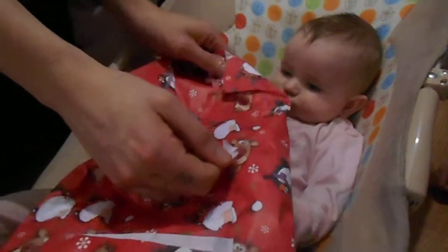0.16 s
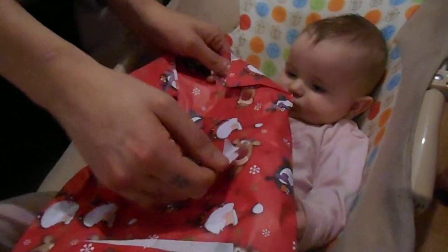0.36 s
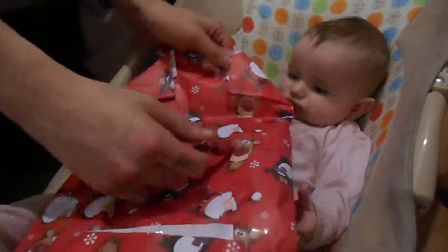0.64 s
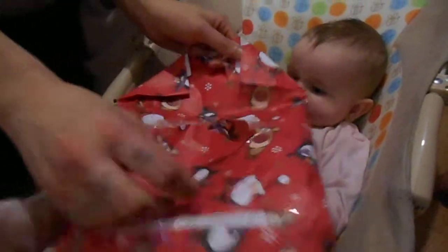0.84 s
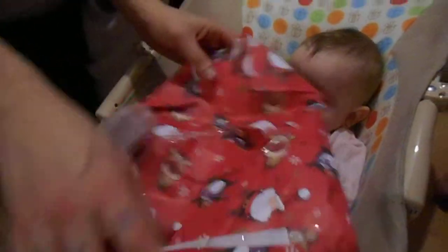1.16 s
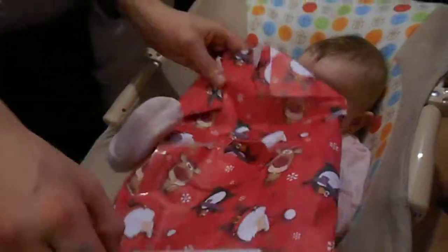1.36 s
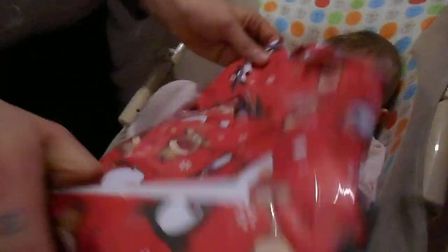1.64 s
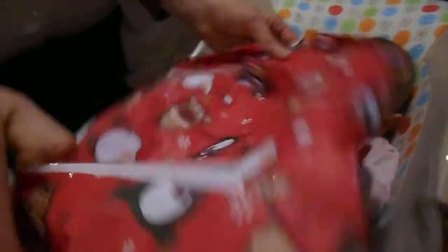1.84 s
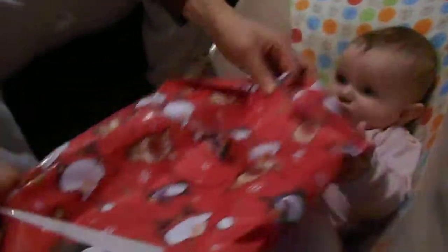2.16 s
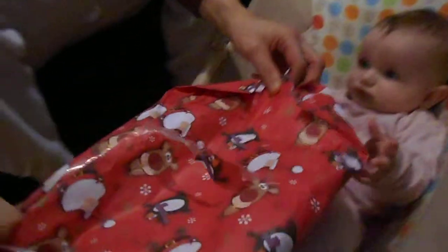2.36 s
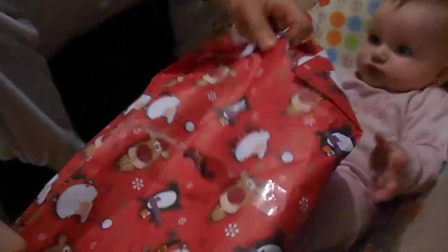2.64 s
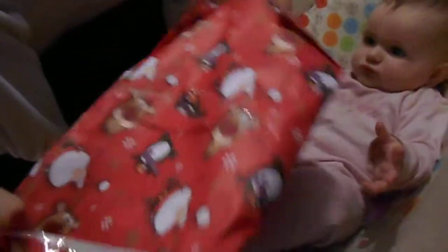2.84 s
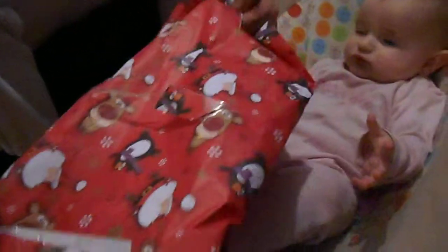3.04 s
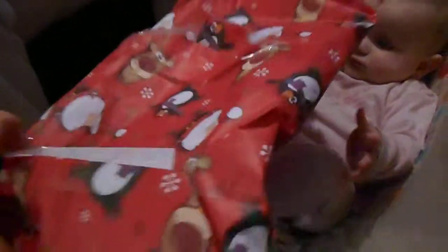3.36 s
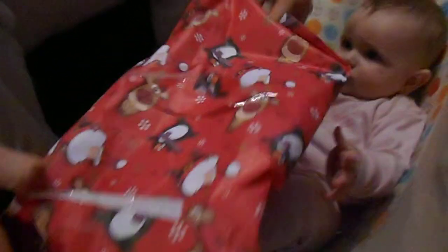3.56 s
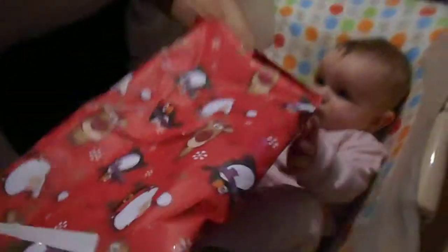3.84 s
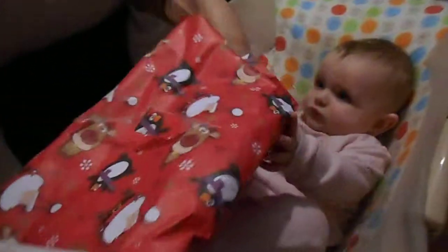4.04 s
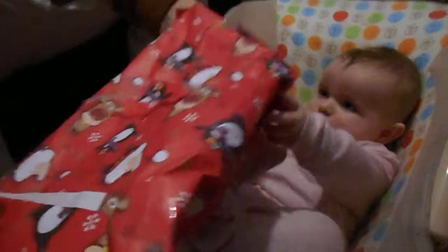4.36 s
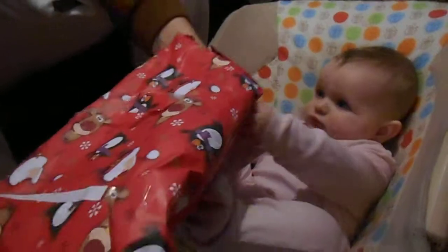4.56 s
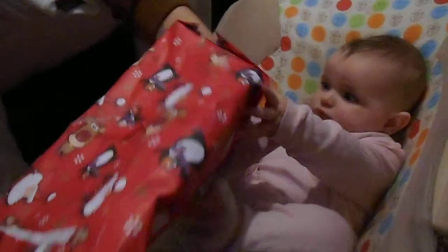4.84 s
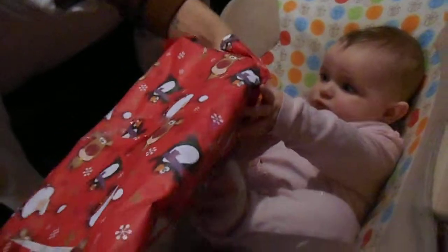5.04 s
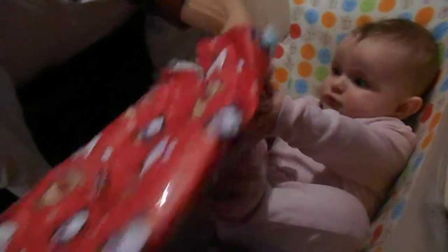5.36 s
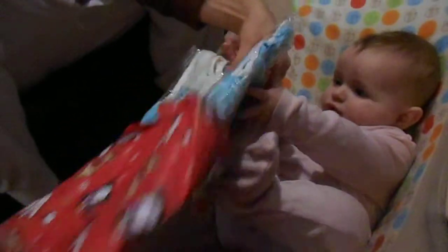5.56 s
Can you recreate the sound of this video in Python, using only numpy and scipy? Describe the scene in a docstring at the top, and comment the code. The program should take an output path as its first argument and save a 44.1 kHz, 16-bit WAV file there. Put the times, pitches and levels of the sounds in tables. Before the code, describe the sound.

Shiny wrapping paper crackles and snaps sharply close by as hands pull it off a boxed present in a small quiet room.

```python
"""Crinkling and sharp snaps start at once: two hands pull shiny wrapping paper off a present.
Small furnished room, camera close by, a quiet noise floor underneath.
Each snap is a crease buckling: a short noise burst with a faint ring at its own note.
Swarms of tiny facet clicks and sliding hiss make the crinkling and the lower flapping of the sheet.
Now and then the wrapped box bumps softly, as a brief decaying tone."""
import sys
import numpy as np
from scipy import signal
from scipy.fft import rfft, irfft
from scipy.io import wavfile
from scipy.ndimage import uniform_filter1d, minimum_filter1d, map_coordinates

SR = 44100
rng = np.random.default_rng(int(sys.argv[2]) if len(sys.argv) > 2 else 0)


def int16_out(signal):
    """Quantize to a 16-bit WAV file."""
    q = np.round(np.clip(np.atleast_2d(signal).T, -1, 1) * 32767)
    wavfile.write(sys.argv[1], SR, q.astype(np.int16))


N = 251678  # length in samples


def amp(db):
    """Decibels to gain."""
    return 10 ** (np.asarray(db) / 20)


def unit(x):
    """Scale to rms 1."""
    return x / np.sqrt(np.mean(x ** 2) + 1e-20)


def along(points, hz):
    """Read a curve of (Hz, value) points at hz, on a log frequency axis."""
    point_hz, values = np.transpose(points)
    return np.interp(np.log(hz + 1), np.log(point_hz + 1), values)


def wobble(rate):
    """A smooth random curve with rate knots a second."""
    knots = rng.standard_normal(int(N * rate / SR) + 4)
    return map_coordinates(knots, [np.arange(N) * rate / SR])


def coloured(x, gain_db, size=2048):
    """Pass x through the causal minimum-phase filter whose level at each frequency is gain_db(hz)."""
    level_db = gain_db(np.fft.rfftfreq(size, 1 / SR))
    cepstrum = irfft(np.log(amp(level_db) + 1e-6))
    # folding the cepstrum forward in time makes the filter causal
    cepstrum[1:size // 2] *= 2
    cepstrum[size // 2 + 1:] = 0
    response = irfft(np.exp(rfft(cepstrum)))
    return signal.fftconvolve(x, response)[:len(x)]


def noise(spectrum):
    """Steady coloured noise of rms 1."""
    return unit(coloured(rng.standard_normal(N), lambda hz: along(spectrum, hz), size=8192))


def add(track, s, sound):
    """Mix a sound into the track at s seconds."""
    part = track[max(round(s * SR), 0):][:len(sound)]
    part += sound[:len(part)]


# The quiet floor. Each row: frequency in Hz, relative level in dB.
FLOOR_SPECTRUM = [(25, -3), (32, -2), (39, -6), (50, -7), (90, -5), (200, 2), (600, -4), (2000, -13),
                  (10000, -21.5)]
FLOOR_DB = -63


def quiet_floor():
    """Steady noise, weighted towards the lows, under everything."""
    return amp(FLOOR_DB) * noise(FLOOR_SPECTRUM)


# Paper merely held and shifted. Each row: time in seconds, fine crinkling level in dB.
GRIP = [(0.0, -44), (0.38, -46), (0.78, -39), (1.13, -40.5), (1.55, -35), (2.0, -37.5), (2.35, -34.5),
        (2.57, -38.5), (3.0, -35.5), (3.24, -34.5), (3.4, -34.5), (3.6, -29.5), (3.95, -35), (5.0, -33),
        (5.7, -33)]
# Pulls and squeezes of the hands. Each row: start in seconds, length in seconds,
# fine crinkling level in dB, flexing level of the broad sheet in dB.
PULLS = [(0.01, 0.08, -23.5, -28.5), (0.245, 0.023, -36, -49), (0.433, 0.042, -35.5, -34.5),
         (0.54, 0.032, -41, -37), (0.648, 0.065, -47, -38.5), (0.84, .05, -25.5, -39),
         (0.97, 0.034, -40, -38), (1.191, .12, -29, -30.5), (1.46, 0.073, -35, -33),
         (1.602, 0.054, -29.5, -29), (1.71, 0.1, -33, -34.5), (1.857, 0.016, -27.5, -33),
         (2.131, 0.11, -40.5, -36), (2.359, 0.017, -31, -34), (2.489, 0.058, -41, -39.5),
         (2.616, 0.085, -29.5, -32.5), (2.756, .25, -29, -31), (3.057, 0.013, -27, -27.5),
         (3.119, 0.054, -32, -36), (3.184, .012, -30, -33), (3.401, 0.11, -35, -34.5),
         (3.621, 0.04, -22.5, -28.5), (3.699, 0.053, -28, -32), (3.795, 0.13, -28.5, -29),
         (3.985, 0.11, -31.5, -32), (4.129, 0.097, -25.5, -28.5), (4.323, 0.037, -27.5, -33.5),
         (4.449, 0.032, -25, -32.5), (4.52, 0.063, -29.5, -31.5), (4.625, 0.024, -27.5, -33.5),
         (4.726, 0.17, -29.5, -38), (4.843, 0.049, -23.5, -25), (4.916, 0.033, -26.5, -38),
         (5.118, 0.0087, -24, -40), (5.199, 0.024, -23, -32.5), (5.29, 0.063, -26.5, -33.5),
         (5.37, .025, -22, -30), (5.425, .03, -26.5, -33), (5.49, .085, -30, -39)]
GRIP_SHEET_DB = -3  # in the grip, the sheet flexes less than it crinkles
ATTACK_S, RELEASE_S = 0.018, 0.016  # a pull builds up, and the paper settles after it


def hands():
    """Levels in dB of crinkling and sheet: each pull swells, holds and settles, its power added to the grip."""
    t = np.arange(N) / SR
    grip_db = np.interp(t, *np.transpose(GRIP))
    power = amp([grip_db, grip_db + GRIP_SHEET_DB]) ** 2
    for s, length, *levels_db in PULLS:
        before, after = np.maximum(s - t, 0), np.maximum(t - s - length, 0)
        shape = np.exp(-before / ATTACK_S - after / RELEASE_S)
        power = power + np.outer(amp(levels_db), shape) ** 2
    return 10 * np.log10(power)


def facet(hz, spectrum, t60, rise, focus_db, octaves, ring_db, ring_t60, size=1024):
    """One flip of a paper facet, rms 1: bending waves scatter and die, while the facet rings briefly at hz."""
    t = np.arange(size) / SR
    swell = 1 - np.exp(-(t / rise) ** 2)
    waves = swell * amp(-60 * t / t60) * rng.standard_normal(size)
    ring = swell * amp(-60 * t / ring_t60) * np.sin(2 * np.pi * (hz * t + rng.random()))

    def colour(f):
        # a facet radiates best around its own note
        distance = np.log2((f + 1) / hz) / octaves
        return along(spectrum, f) + focus_db / (1 + distance ** 2)

    return unit(coloured(unit(waves) + amp(ring_db) * unit(ring), colour))


RING_OUTLASTS = 2.8  # ring decay time of a click, in multiples of its noise decay time


def swarm(spectrum, centre_hz, rate, spread_db, t60, ring_db, slide_db, count=48):
    """Many small facets click at random, rate a second in all, over the hiss of paper sliding; rms near 1."""
    clicks = np.zeros(N)
    # facet notes reach about an octave either side of the centre
    for hz in centre_hz * np.exp(0.688 * np.linspace(-1, 1, count)):
        at = rng.integers(0, N, int(rate * N / SR / count))
        sizes_db = spread_db * np.clip(rng.standard_normal(len(at)), -2, 2)
        sizes = amp(sizes_db) * rng.choice([-1, 1], len(at))
        click = facet(hz, spectrum, t60=t60, rise=0.00014, focus_db=4, octaves=0.44,
                      ring_db=ring_db, ring_t60=RING_OUTLASTS * t60)
        clicks += signal.oaconvolve(np.bincount(at, sizes, N), click)[:N]
    both = unit(clicks) + amp(slide_db) * noise(spectrum)
    # the hands feed in energy steadily, however it is split among the clicks
    local_power = np.abs(uniform_filter1d(both ** 2, size=1300))  # over 29 ms
    return both / np.sqrt(local_power + 1e-6)


# Four parts of the paper and box. Each row: frequency in Hz, relative level in dB.
CRINKLE_SPECTRUM = [(300, -53), (1000, -5.5), (1900, -1.5), (3100, 2), (4500, -2.5), (6500, -6),
                    (8500, -11), (10200, -19)]  # small wrinkles
SHEET_SPECTRUM = [(60, -55), (200, -28), (450, -13.5), (720, 0.5), (1200, 2), (1700, -1), (2400, -9),
                  (5000, -42)]  # broad panels of the sheet
BOX_SPECTRUM = [(40, -25), (85, -9.5), (140, -9), (200, 2), (320, 0), (480, 3.5), (900, -32.5)]  # dull drumming on the box inside
GLOSS_SPECTRUM = [(1500, -50), (3500, -7), (6000, 3.5), (8500, -0.5), (10200, -15.5)]  # fingers on the glossy coating


def crumple(crinkle_db, sheet_db):
    """Small wrinkles crackle brightly and broad panels flap lower; both catch and slip together."""
    slips = np.tanh(wobble(170))  # from -1, caught, to 1, slipping
    crinkle = swarm(CRINKLE_SPECTRUM, centre_hz=3680, rate=480, spread_db=2.5, t60=0.0085,
                    ring_db=-12.5, slide_db=-9.5)
    sheet = swarm(SHEET_SPECTRUM, centre_hz=1121, rate=450, spread_db=6.5, t60=0.009,
                  ring_db=-16, slide_db=-5.5)
    crinkle *= amp(crinkle_db + 3.43 * slips - 0.64)
    sheet *= amp(sheet_db + 3.6 * slips - 1.74)
    # the flexing sheet also drums dully on the box inside
    box = amp(sheet_db - 25.5) * noise(BOX_SPECTRUM)
    # fingers whisper over the glossy coating even when the paper hardly moves
    whisper_db = 0.66 * crinkle_db - 24.0 + 3.3 * wobble(14) + 3.7 * slips
    whisper = amp(whisper_db) * noise(GLOSS_SPECTRUM)
    return crinkle + sheet + box + whisper


# The creases that stand out as they buckle, close by.
# Each row: start in seconds, rms level in dB over the first 5 ms, note of the flipping facet in Hz.
SNAPS = [(0.0044, -18, 3250), (0.0329, -16.5, 3100), (0.0747, -24, 2400), (0.1964, -24, 3980),
         (0.2357, -20, 2360), (0.2437, -21.5, 2260), (0.2996, -27, 3750), (0.3326, -27, 3030),
         (0.3907, -35.5, 6850), (0.4712, -22, 1060), (0.4949, -22, 3650), (0.5893, -24.5, 2110),
         (0.6297, -34, 2910), (0.685, -23, 3800), (0.7843, -15, 5400), (0.8254, -21.5, 3130),
         (0.849, -20, 2800), (0.8642, -15, 2890), (0.977, -21.5, 3340), (1.0282, -24.5, 1710),
         (1.07, -17, 2990), (1.23, -12.5, 2870), (1.2779, -18, 4100), (1.2951, -10, 3880),
         (1.3093, -8.5, 3940), (1.32, -21, 3700), (1.337, -14, 2240), (1.4106, -27, 2600),
         (1.426, -25, 3350), (1.4562, -18.5, 4230), (1.505, -11, 3980), (1.593, -16.5, 3070),
         (1.6274, -23.5, 3070), (1.737, -14.5, 3980), (1.7461, -17, 3460), (1.7986, -15, 2305),
         (1.808, -20, 4220), (1.8615, -19, 3170), (1.8737, -18, 4140), (1.933, -23, 3320),
         (1.9698, -23, 5200), (2.093, -23, 2750), (2.1317, -21.5, 2780), (2.1796, -18.5, 5330),
         (2.1874, -16.5, 3550), (2.2237, -16, 3800), (2.3611, -23, 3440), (2.4222, -9, 4810),
         (2.494, -17, 4400), (2.5421, -14.5, 1930), (2.6192, -16.5, 3010), (2.6322, -17, 2720),
         (2.7075, -19.5, 3300), (2.7994, -16.5, 3430), (2.8903, -16, 3520), (2.923, -12, 3820),
         (2.9975, -17, 4540), (3.0436, -22.5, 3180), (3.069, -15, 4250), (3.1196, -22, 3110),
         (3.2046, -17.5, 2900), (3.3177, -26.5, 3300), (3.3638, -15, 3580), (3.4077, -23.5, 3140),
         (3.4213, -22.5, 3980), (3.5172, -21.5, 3280), (3.5922, -18, 3620), (3.6311, -14, 3300),
         (3.6894, -17, 2710), (3.895, -18, 3800), (3.9179, -13.5, 1356), (3.9884, -17.5, 2190),
         (4.021, -20, 2220), (4.1177, -19.5, 2870), (4.1386, -15.5, 2830), (4.2032, -17, 3360),
         (4.3583, -18, 3660), (4.4081, -21, 3960), (4.466, -22, 3250), (4.5651, -17.5, 2300),
         (4.6422, -17.5, 3800), (4.708, -22, 1830), (5.0295, -21, 2780), (5.0846, -15, 3880),
         (5.207, -12, 3040), (5.3166, -16, 2700), (5.346, -18.5, 4120), (5.3767, -19.5, 2080),
         (5.6323, -22, 3840), (5.6963, -22.5, 4040)]
# Colour of a buckling crease. Each row: frequency in Hz, relative level in dB.
CREASE_SPECTRUM = [(40, -43.5), (120, -28.5), (250, -24), (330, -13.5), (450, -14), (700, -1), (1200, -0.5),
                   (3000, -1), (5500, -2.5), (8500, -6), (10200, -17.5)]
SNAP_T60_S, SNAP_RISE_S = 0.014, 0.00025  # typical values; each snap scatters around them


def snaps(creases):
    """Creases buckle, each with its own note, onset and length."""
    out = np.zeros(N)
    head = round(0.005 * SR)
    for s, db, hz in creases:
        length_chance, rise_chance = rng.standard_normal(2)
        snap = facet(hz, CREASE_SPECTRUM, t60=SNAP_T60_S * np.exp(0.39 * length_chance),
                     rise=SNAP_RISE_S * np.exp(0.5 * rise_chance), focus_db=6.5, octaves=0.91,
                     ring_db=-11, ring_t60=55 / hz)  # low notes ring longer
        head_rms = np.sqrt(np.mean(snap[:head] ** 2))
        add(out, s, amp(db) * snap / head_rms)
    return out


CREASES_PER_S = 28
CREASE_DB, CREASE_SPREAD_DB = -6, 1.23  # level offset and its scatter
CREASE_GROWS = 0.63  # dB gained per dB of crinkling
CREASE_HZ, CREASE_OCTAVES = 3120, 0.535  # usual note and its scatter


def lesser_creases(crinkle_db):
    """Rows (s, dB, Hz) of small creases giving way at random, louder the harder the hands work."""
    count = int(CREASES_PER_S * N / SR)
    at = rng.integers(0, N, count)
    size, note = rng.standard_normal((2, count))
    db = CREASE_DB + CREASE_GROWS * crinkle_db[at] + CREASE_SPREAD_DB * size
    hz = CREASE_HZ * 2 ** (CREASE_OCTAVES * note)
    return np.transpose([at / SR, db, hz])


# Soft bumps of the wrapped box.
# Each row: start in seconds, level in dB before onset and decay, pitch in Hz, t60 in seconds.
BUMPS = [(1.071, -18.5, 743, 0.028), (1.296, -28, 220, 0.022), (1.309, -26, 343, 0.025),
         (1.338, -26, 307, 0.016), (3.629, -29, 226, 0.025), (3.63, -23, 680, 0.037),
         (3.917, -13, 1090, 0.021), (4.752, -33, 528, 0.077)]


def bumps():
    """Each bump rings a panel of the box for a moment: a decaying sine with a soft onset."""
    out = np.zeros(N)
    t = np.arange(SR // 5) / SR
    for s, db, hz, t60 in BUMPS:
        onset = 1 - np.exp(-t / 0.0012)
        add(out, s, amp(db - 60 * t / t60) * onset * np.sin(2 * np.pi * hz * t))
    return out


# Decay of the small furnished room. Each row: frequency in Hz, t60 in seconds.
ROOM_T60 = [(150, 0.78), (1000, 0.17), (4000, 0.15), (10000, 0.18)]


def room(x):
    """The short diffuse answer of the room: decaying noise 5 ms late, lows lasting longest."""
    hz, t, z = signal.stft(rng.standard_normal(SR // 2), SR, nperseg=256)
    decay = amp(-60 * t / along(ROOM_T60, hz)[:, None])
    tail = signal.istft(z * decay, SR, nperseg=256)[1]
    delay = np.zeros(round(0.005 * SR))
    return signal.fftconvolve(x, np.concatenate([delay, tail / np.linalg.norm(tail)]))[:N]


def scene():
    """Paper and box close by, answered by the room, over the quiet floor."""
    crinkle_db, sheet_db = hands()
    near = crumple(crinkle_db, sheet_db) + bumps()
    near = near + snaps(SNAPS) + snaps(lesser_creases(crinkle_db))
    return (near + amp(-20.5) * room(near) + quiet_floor())[None]


def lowpass(x, edge_hz):
    """A steep low-pass."""
    taps = signal.firwin(161, edge_hz, window=("kaiser", 6), fs=SR)
    return signal.fftconvolve(x, taps[None], mode="same", axes=1)


# Treble limit: a steep fall above 10.3 kHz, with a faint leak near 11.8 kHz.
# Each row: frequency in Hz, gain in dB.
TREBLE_LIMIT = [(10300, 0), (11000, -28), (11800, -20), (12700, -42), (16000, -45)]
CEILING_DB = -2  # peak limit ahead of the final low-pass
TOP_HZ = 15900  # band limit


def record(dry):
    """Little treble gets through, the tallest peaks are turned down and a low-pass limits the band."""
    heard = coloured(dry[0], lambda hz: along(TREBLE_LIMIT, hz))
    needed = np.minimum(1, amp(CEILING_DB) / (np.abs(heard) + 1e-9))
    # hold each dip for 31 samples, then smooth it
    gain = uniform_filter1d(minimum_filter1d(needed, size=31), size=31)
    return lowpass((gain * heard)[None], edge_hz=TOP_HZ)


dry = scene()
out = record(dry)
int16_out(out)
```